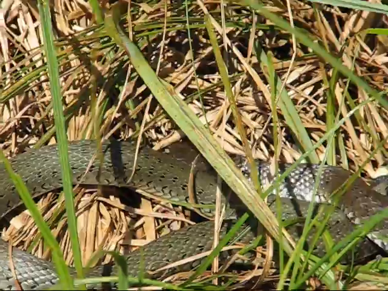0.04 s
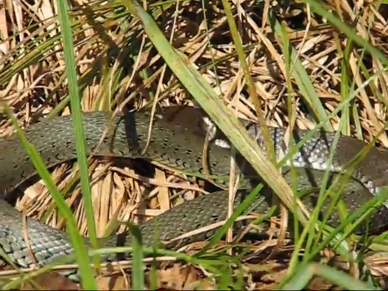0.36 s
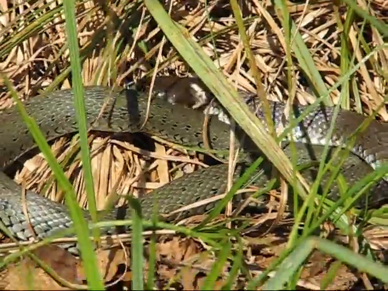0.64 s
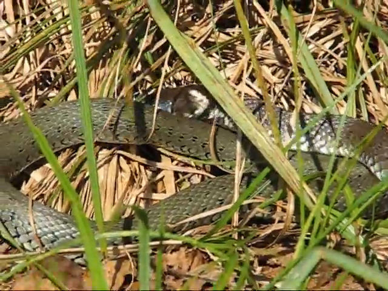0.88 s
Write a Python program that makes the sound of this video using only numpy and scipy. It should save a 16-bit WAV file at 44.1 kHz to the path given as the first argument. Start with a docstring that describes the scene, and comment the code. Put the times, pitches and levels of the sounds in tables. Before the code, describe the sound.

A low, far-off hum of traffic and engines under a light breeze and faint grass rustle.

```python
"""A quiet sunny bank of dry grass. Far traffic rumbles and slowly recedes, its tyre treads singing in a
narrow band. A distant engine hums at harmonics of its firing rate; a second drones, sinking in pitch
and swelling late on. Light wind sheds eddies at the microphone, the grass rustles and dry stalks tick.
The camera's electronics add hiss and a thin whine; the sound starts a moment in and fades up."""
import sys
import numpy as np
from scipy import signal
from scipy.fft import rfft, irfft
from scipy.io import wavfile
from scipy.ndimage import uniform_filter1d

SR = 44100
rng = np.random.default_rng(int(sys.argv[2]) if len(sys.argv) > 2 else 0)


def to_wav(s):
    """Save 16-bit WAV."""
    ch = np.atleast_2d(s).T  # columns
    pcm = np.round(np.clip(ch, -1, 1) * 32767)  # PCM
    wavfile.write(sys.argv[1], SR, pcm.astype(np.int16))


N = 176400
TIME = np.arange(N) / SR
FREQS = np.maximum(np.fft.rfftfreq(N, 1 / SR), 1)


def undb(db):
    """Decibels to amplitude ratio."""
    return 10 ** (np.asarray(db) / 20)


def over_time(rows, col=1):
    """Linear interpolation of a table column in time."""
    rows = np.array(rows)
    return np.interp(TIME, rows[:, 0], rows[:, col])


def over_hz(rows, col=1):
    """Linear interpolation of a table column in log frequency."""
    rows = np.array(rows)
    return np.interp(np.log(FREQS), np.log(rows[:, 0]), rows[:, col])


def rolled_off(rows, db_per_octave=12):
    """Low-pass slope: a spectrum that keeps falling above its last point."""
    octaves = np.log2(np.maximum(FREQS / rows[-1][0], 1))
    return over_hz(rows) - db_per_octave * octaves


def waver(rate_hz):
    """Slow fluctuation: random steps smoothed twice, with unit variance."""
    hold = max(int(SR / rate_hz), 2)
    steps = np.repeat(rng.standard_normal(N // hold + 1), hold)
    smooth = uniform_filter1d(uniform_filter1d(steps, hold), hold)[:N]
    return (smooth - smooth.mean()) / smooth.std()


def phase_of(hz):
    """Phase is the time integral of frequency."""
    return 2 * np.pi * np.cumsum(hz) / SR


def noise(spectrum_db, coherence, lead_rad=0, left_db=0):
    """Partial coherence: stereo noise of rms 1 whose left channel shares part of the right."""
    right, independent = rfft(rng.standard_normal((2, N)))
    left = coherence * right + np.sqrt(1 - coherence ** 2) * independent
    left *= np.exp(1j * lead_rad) * undb(left_db)
    pair = irfft(np.array([left, right]) * undb(spectrum_db), N)
    return pair / pair.std()


# Spectra of road rumble, exhaust roar and tyre roar (frequency [Hz], relative density [dB])
RUMBLE_SPECTRUM = [(25, -25), (50, -4), (70, 6.5), (92, 3.5), (120, 0), (160, -12.5), (250, -37)]
EXHAUST_SPECTRUM = [(90, -11.5), (150, -1), (185, -0.5), (215, -1.5), (260, -5.5), (330, -19), (450, -24),
                    (800, -39)]
TYRE_SPECTRUM = [(100, -7.5), (300, -2.5), (480, -2.5), (700, -5), (1000, -2.3), (1430, -4.5), (1650, -3),
                 (2400, -7.5), (3200, -12.3), (5000, -22), (9000, -31.5)]
# Their envelopes (time [s], level [dB])
RUMBLE_ENVELOPE = [(0.1, -46), (0.42, -48), (0.52, -41.5), (0.78, -45), (1.2, -42.5), (1.6, -44),
                   (2.1, -43), (2.5, -47), (2.78, -42.5), (3.0, -50.5), (3.3, -45), (3.7, -51),
                   (4.0, -48.5)]
EXHAUST_ENVELOPE = [(0.1, -51), (1.0, -46), (1.7, -46.5), (2.3, -52.5), (2.9, -52), (3.4, -58.5),
                    (4.0, -55)]
TYRE_ENVELOPE = [(0.13, -46), (0.45, -45.6), (0.65, -46.5), (0.82, -45), (1.05, -45.8), (1.25, -45.4),
                 (1.7, -45.4), (1.95, -47.3), (2.15, -46.4), (2.55, -47.6), (3.0, -48.6), (3.4, -47.7),
                 (3.6, -48.7), (4.0, -48.6)]
# Tyre roar between the channels (frequency [Hz], coherence [0..1], left minus right [dB])
TYRE_STEREO = [(297, 0.75, -0.4), (780, 0.98, -1.1), (1400, 0.6, -0.5), (1950, 0.86, -4.5),
               (2600, 0.34, -2.5), (3980, 0.099, 3)]

def traffic():
    """Incoherent addition: far vehicles merge into three bands of noise that swell and recede."""
    rumble = noise(rolled_off(RUMBLE_SPECTRUM), coherence=1, left_db=-0.4)
    rumble *= undb(over_time(RUMBLE_ENVELOPE))
    exhaust = noise(rolled_off(EXHAUST_SPECTRUM), coherence=1, left_db=-0.8)
    exhaust *= undb(over_time(EXHAUST_ENVELOPE) + 0.53 * waver(7.4))
    tyres = noise(rolled_off(TYRE_SPECTRUM), over_hz(TYRE_STEREO), left_db=over_hz(TYRE_STEREO, 2))
    tyres *= undb(over_time(TYRE_ENVELOPE) + 0.4 * waver(14))
    return rumble + exhaust + tyres


# Singing of tyre treads (time [s], centre frequency [Hz], level [dB])
TREAD_BAND = [(0.1, 1150, -60), (0.6, 1200, -57), (0.85, 1080, -50), (1.2, 1150, -55), (1.5, 1020, -52),
              (1.75, 1100, -57), (2.0, 1060, -52), (2.6, 1080, -59), (3.3, 1000, -56), (4.0, 950, -62)]

def treads(half_width_hz=110, drift=0.04, waver_db=2):
    """Narrow-band noise: treads sing as a wandering tone multiplied by low-pass noise."""
    low_noise = noise(rolled_off([(1, 0), (half_width_hz, 0)]), coherence=0.85, left_db=-1)
    centre_hz = over_time(TREAD_BAND) * (1 + drift * waver(6))
    carrier = np.sqrt(2) * np.sin(phase_of(centre_hz))
    return low_noise * carrier * undb(over_time(TREAD_BAND, 2) + waver_db * waver(18))


# Pitch of the steady engine (time [s], firing rate [Hz])
FIRING_RATE = [(0.1, 105.15), (1.5, 105.75), (2.0, 106.1), (4.0, 106.7)]
# Its harmonics (time [s], level of harmonics 1, 2, 3, 4 [dB])
HARMONIC_LEVELS = [(0.1, -47, -52, -49.5, -57), (0.9, -45, -51, -51, -54), (1.2, -47, -50, -52, -57.5),
                   (1.75, -48.5, -53, -52, -61), (2.2, -46, -52.5, -50.5, -58.5),
                   (2.65, -48.5, -55, -55, -59), (3.15, -45.5, -65, -55, -67), (3.55, -47, -68, -62, -66),
                   (4.0, -47, -66, -65, -70)]
# Single tone of the second engine (time [s], frequency [Hz], level [dB])
DRONE_TONE = [(0.1, 147, -51.5), (0.75, 144, -46), (1.0, 145, -70), (2.3, 143.7, -59), (2.6, 142, -50),
              (3.1, 138.6, -48.5), (3.5, 137.6, -44.5), (4.0, 136, -52.5)]

def engines():
    """Periodic firing gives line spectra; the lines of two far engines waver in the moving air."""
    firing_phase = phase_of(over_time(FIRING_RATE) * (1 + 0.0012 * waver(12)))
    hum = np.zeros(N)
    for harmonic in range(1, 5):
        gain = undb(over_time(HARMONIC_LEVELS, harmonic) + 0.7 * waver(7.1))
        hum += gain * np.sin(harmonic * firing_phase + rng.uniform(0, 2 * np.pi))
    drone_phase = phase_of(over_time(DRONE_TONE) * (1 + 0.0042 * waver(9.76)))
    drone = undb(over_time(DRONE_TONE, 2) + 1.35 * waver(8.33)) * np.sin(drone_phase)
    return np.sqrt(2) * (hum + drone) * undb([[-0.3], [0.3]])  # slightly to the right


# Spectrum of wind at the microphone (frequency [Hz], relative density [dB])
WIND_SPECTRUM = [(5, -4), (15, -2), (30, -6), (50, -5.5), (90, -14), (200, -41)]
# Its envelope (time [s], level [dB])
WIND_ENVELOPE = [(0.1, -49), (0.8, -50), (1.1, -51), (2.0, -48), (2.95, -49), (3.16, -43.5), (3.4, -44),
                 (3.65, -47.5), (4.0, -47.5)]

def wind(eddy_db=1.5, eddies_per_s=13):
    """Turbulence: soft eddies make low-frequency pressure fluctuations at the microphone."""
    pressure = noise(rolled_off(WIND_SPECTRUM), coherence=0.66)
    return pressure * undb(over_time(WIND_ENVELOPE) + eddy_db * waver(eddies_per_s))


# Spectrum of the hiss (frequency [Hz], left relative density [dB], right relative density [dB])
HISS_SPECTRA = [(500, -3.5, -4), (2000, 1, 1), (3000, -3, -2), (4000, 0.5, -0.5), (4940, 0, -4.5),
                (5740, 1.5, 2), (6300, 0, 2.5), (6970, -2, 1.5), (7420, -4.5, -1.5), (8400, -10.5, -9.5),
                (9600, -9, -11), (10760, -10.5, -7.5), (12200, -15, -14), (12900, -18, -16),
                (15400, -19, -20.5)]
# Hiss between the channels (frequency [Hz], coherence [0..1], phase lead of left [rad])
HISS_COHERENCE = [(500, 0.16, 1.3), (2000, .2, 3), (3350, 0.46, 3.82), (5050, 0.34, 0.72),
                  (5310, 0.18, 2.4), (6700, 0.87, 4.46), (7460, 0.19, 2.8), (8900, 0.098, 5.7),
                  (10800, 0.098, 14), (15000, .08, 13)]

def camera(hiss_db=-50, fade_db_per_s=0.22, whine_hz=8010):
    """Electronic self-noise: broadband hiss and a thin whine, mostly on the right."""
    spectra = np.array([over_hz(HISS_SPECTRA), over_hz(HISS_SPECTRA, 2)])
    hiss = noise(spectra, over_hz(HISS_COHERENCE), lead_rad=over_hz(HISS_COHERENCE, 2))
    hiss *= undb(hiss_db - fade_db_per_s * TIME)
    whine = np.sqrt(2) * np.sin(2 * np.pi * whine_hz * TIME) * undb(0.8 * waver(20))
    antiphase_gains = np.array([[-undb(-88)], [undb(-67)]])
    return hiss + whine * antiphase_gains


# Spectrum of rustling grass (frequency [Hz], relative density [dB])
RUSTLE_SPECTRUM = [(1200, -11), (2300, 3), (3500, -4.5), (6000, 0.5), (7200, -1), (8500, -14), (11000, -14),
                   (15000, -30)]
# Its envelope (time [s], level [dB])
RUSTLE_ENVELOPE = [(0.1, -63), (0.47, -56), (0.85, -62), (1.15, -57), (1.7, -59.5), (1.92, -65),
                   (2.12, -57), (2.4, -61), (2.6, -65), (3.45, -68), (3.65, -58), (4.0, -65)]

def grass():
    """Friction: blades brushed by the breeze give a soft, diffuse noise that comes and goes."""
    return noise(over_hz(RUSTLE_SPECTRUM), coherence=0.1) * undb(over_time(RUSTLE_ENVELOPE))


# Spectrum of the stalks' fine crackle (frequency [Hz], relative density [dB])
CRACKLE_SPECTRUM = [(1500, -22), (4000, -3), (7000, 0), (12000, 0), (16000, -14)]

def stalk_crackle(per_s=40, level_db=-57.5, spread_db=1.5, decay_s=0.0015):
    """Poisson process: dry stalks give tiny bursts of noise at independent random times."""
    impulses = (rng.random(N) < per_s / SR) * undb(level_db + spread_db * rng.standard_normal(N))
    envelope = signal.lfilter([1], [1, -np.exp(-1 / (decay_s * SR))], impulses)
    return envelope * noise(over_hz(CRACKLE_SPECTRUM), coherence=0.4)


# Single ticks of dry stalks (time [s], level [dB], spectral peak [Hz])
STALK_TICKS = [(0.406, -48, 8000), (1.082, -56, 9500), (1.171, -53, 7000), (1.958, -57, 10500),
               (2.115, -57, 10000), (2.565, -55.5, 9000), (3.139, -56, 11500), (3.204, -59, 10500)]

def stalk_ticks(decay_s=0.0055, skirt_db_per_octave=19):
    """Damped transients: each tick is a band of noise that starts abruptly and decays exponentially."""
    ticks = np.zeros((2, N))
    for onset, level_db, peak_hz in STALK_TICKS:
        envelope = (TIME >= onset) * np.exp(-np.abs(TIME - onset) / decay_s)
        spectrum_db = -skirt_db_per_octave * np.abs(np.log2(FREQS / peak_hz))
        ticks += undb(level_db) * envelope * noise(spectrum_db, coherence=0.4)
    return ticks


def scene():
    """Superposition: all sources add linearly in the two channels."""
    return traffic() + treads() + engines() + wind() + camera() + grass() + stalk_crackle() + stalk_ticks()


START_S, FADE_UP_S, START_DB, CUTOFF_HZ = 0.129, 0.57, -9.3, 15750

def record(dry):
    """Gain ramp and band limiting: the camera switches on, fades up and cuts the highest treble."""
    elapsed = TIME - START_S
    gain = (elapsed > 0) * undb(START_DB * np.clip(1 - elapsed / FADE_UP_S, 0, 1))
    low_pass = signal.ellip(10, 0.1, 80, CUTOFF_HZ, fs=SR, output="sos")
    return signal.sosfilt(low_pass, dry * gain)


dry = scene()
out = record(dry)
to_wav(out)
```